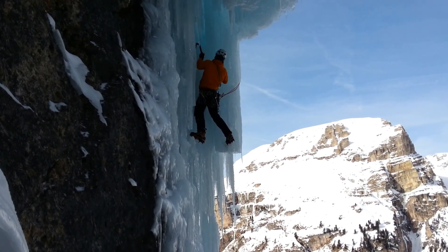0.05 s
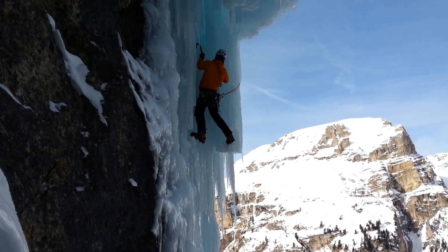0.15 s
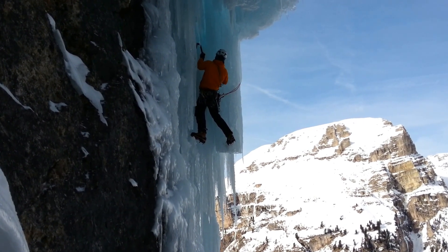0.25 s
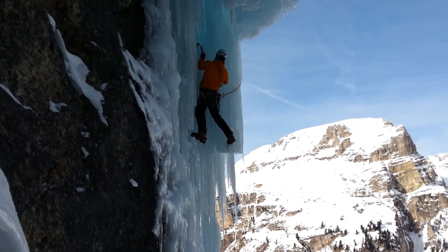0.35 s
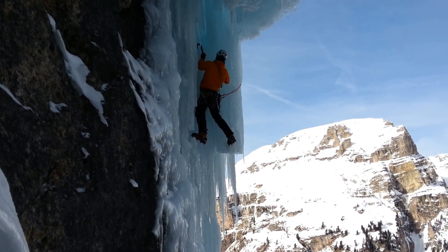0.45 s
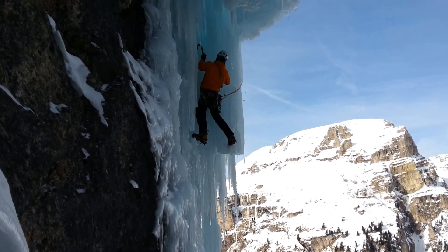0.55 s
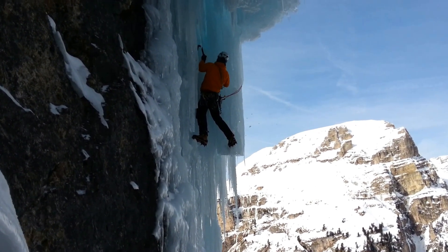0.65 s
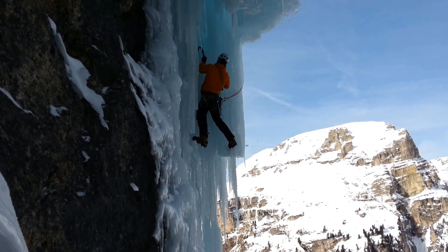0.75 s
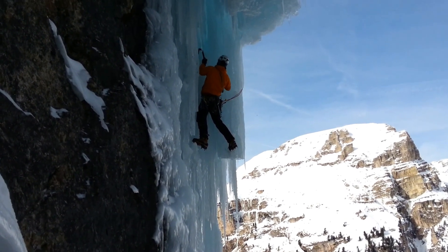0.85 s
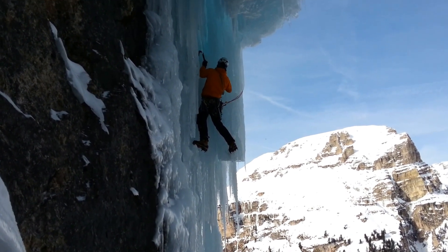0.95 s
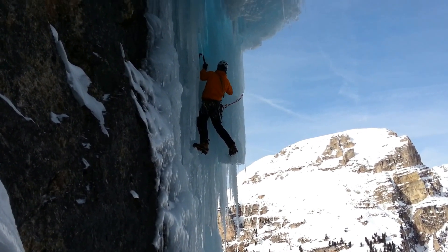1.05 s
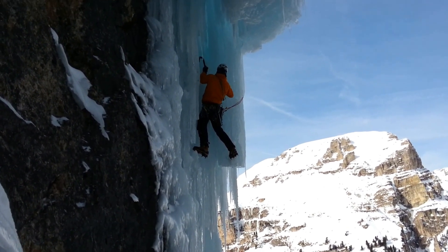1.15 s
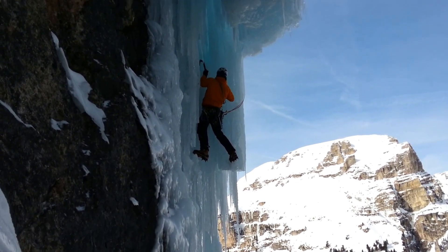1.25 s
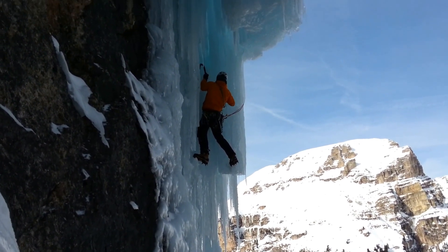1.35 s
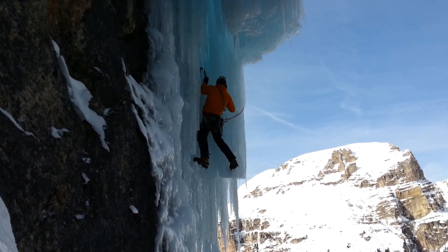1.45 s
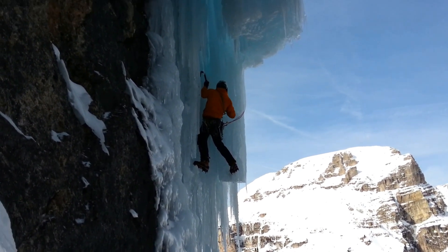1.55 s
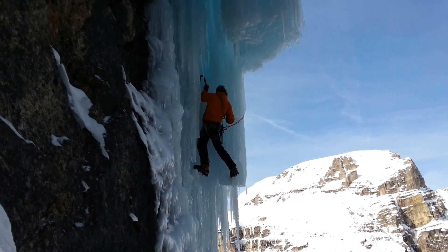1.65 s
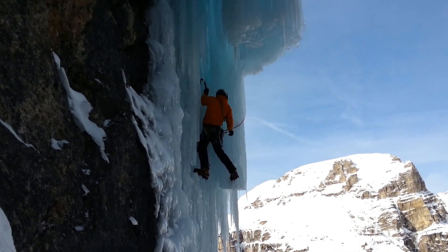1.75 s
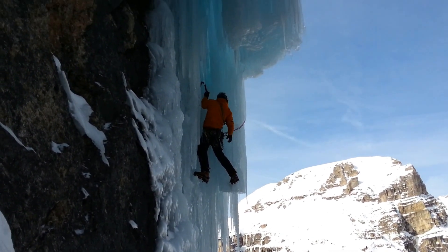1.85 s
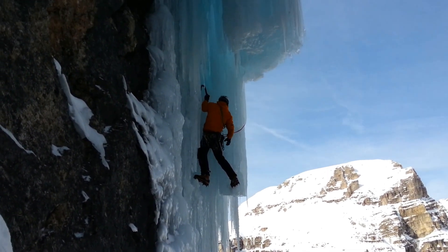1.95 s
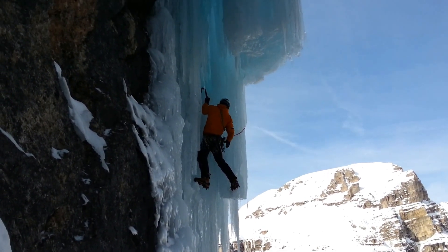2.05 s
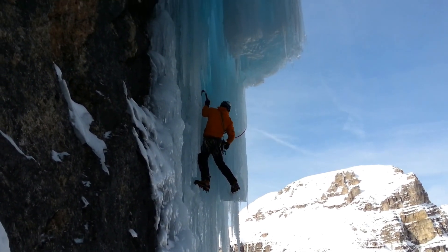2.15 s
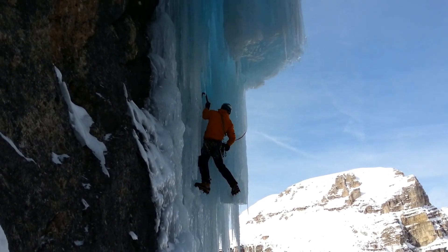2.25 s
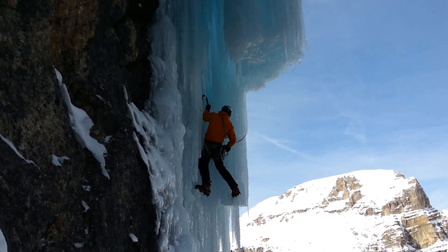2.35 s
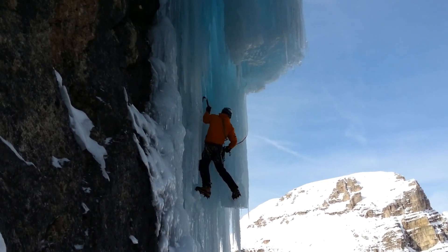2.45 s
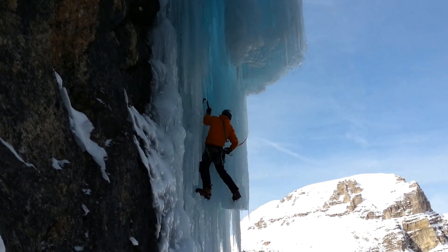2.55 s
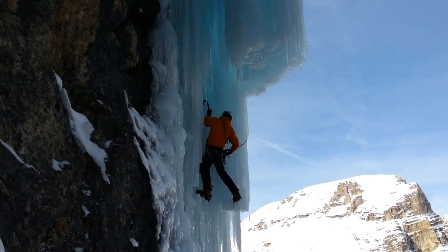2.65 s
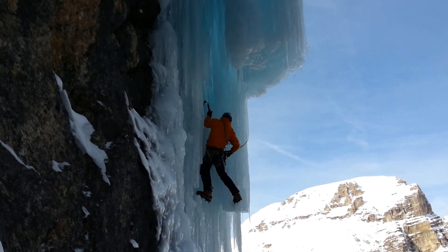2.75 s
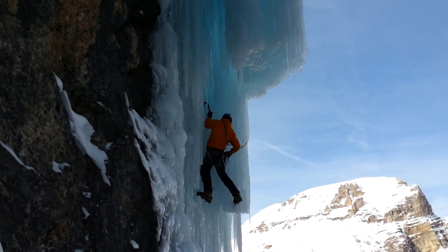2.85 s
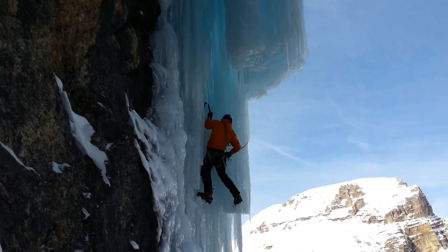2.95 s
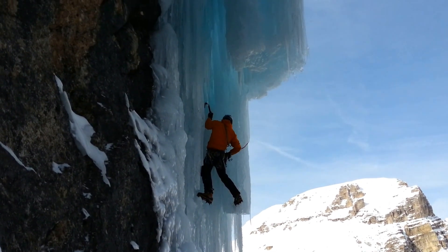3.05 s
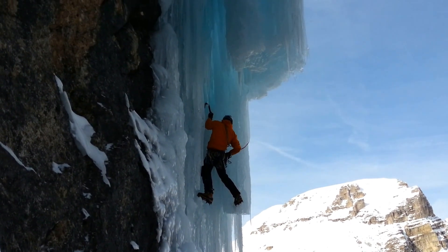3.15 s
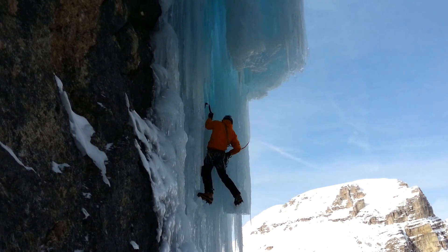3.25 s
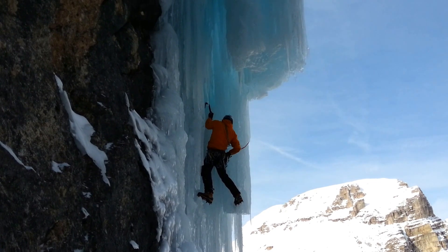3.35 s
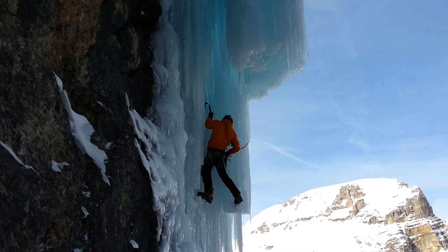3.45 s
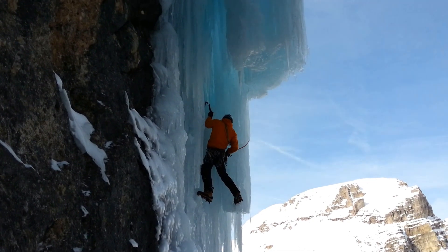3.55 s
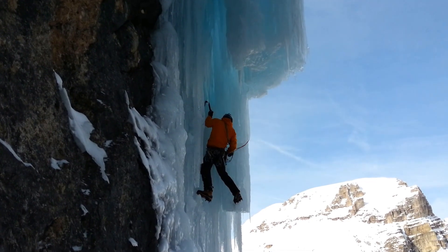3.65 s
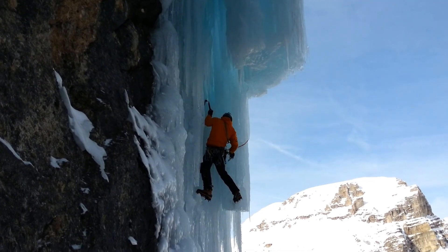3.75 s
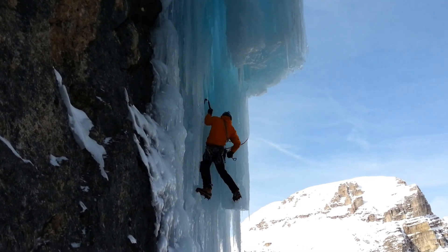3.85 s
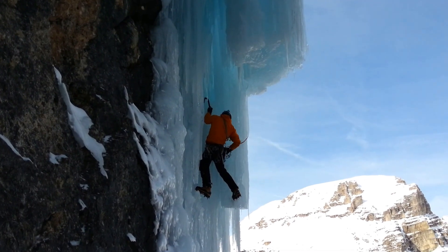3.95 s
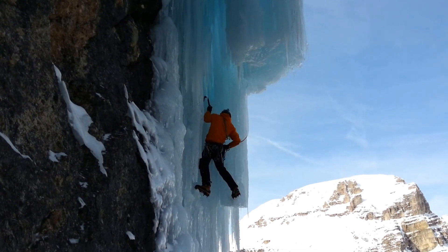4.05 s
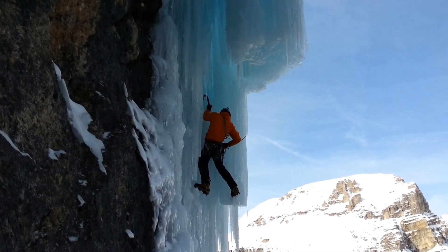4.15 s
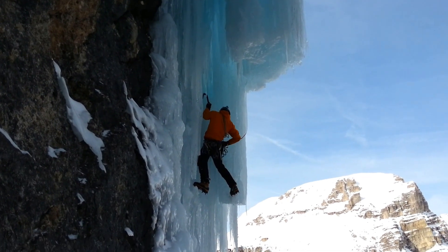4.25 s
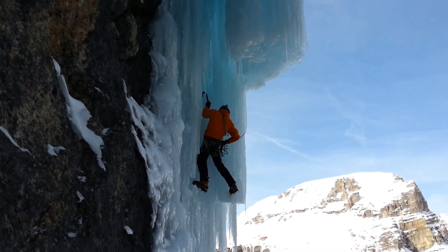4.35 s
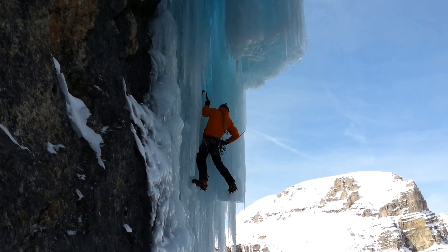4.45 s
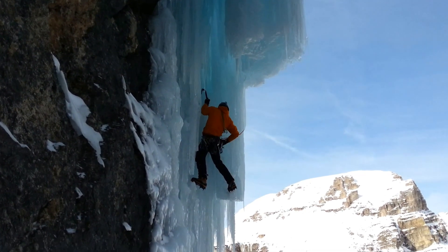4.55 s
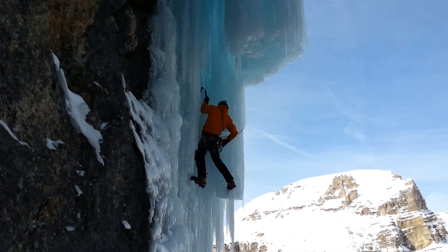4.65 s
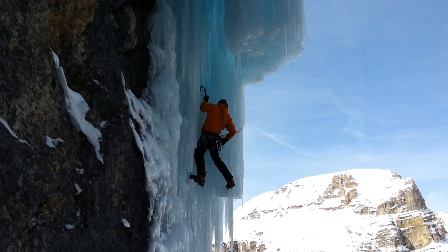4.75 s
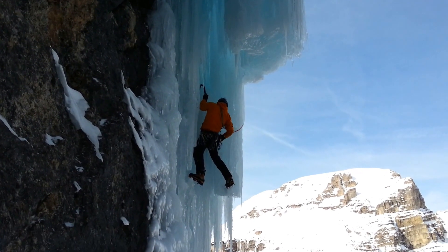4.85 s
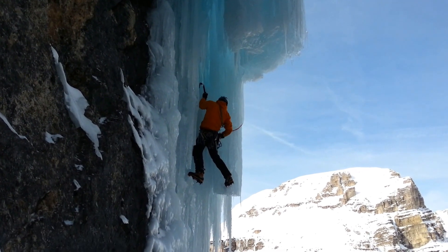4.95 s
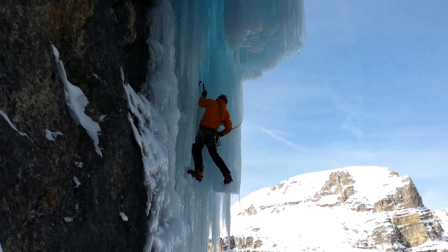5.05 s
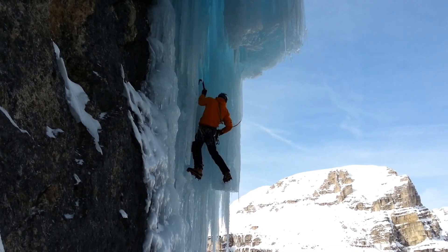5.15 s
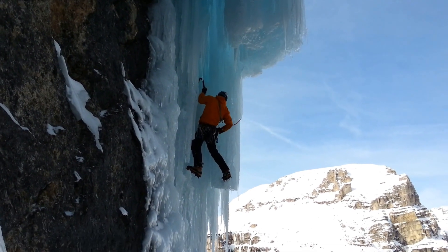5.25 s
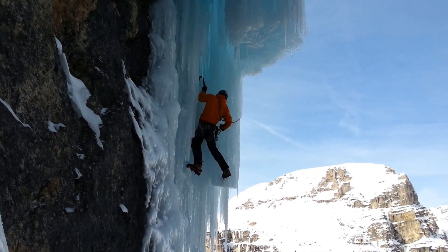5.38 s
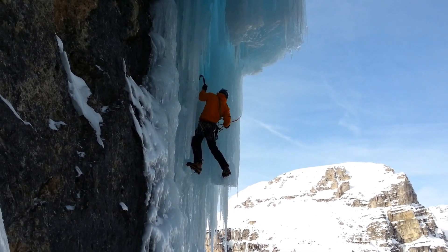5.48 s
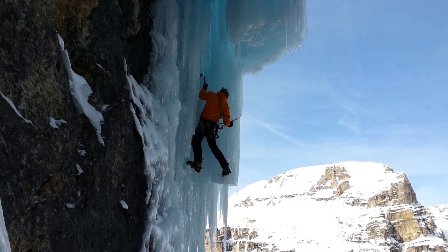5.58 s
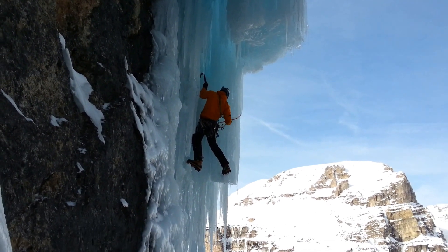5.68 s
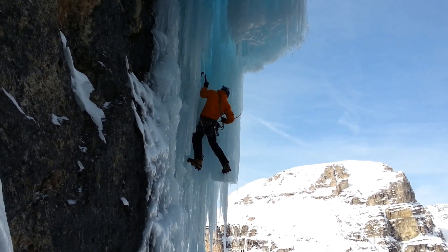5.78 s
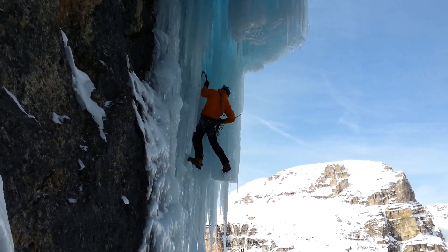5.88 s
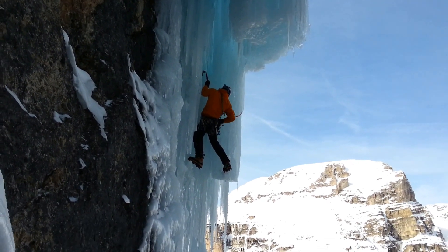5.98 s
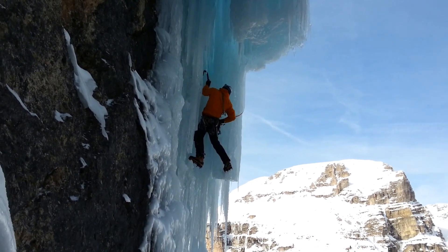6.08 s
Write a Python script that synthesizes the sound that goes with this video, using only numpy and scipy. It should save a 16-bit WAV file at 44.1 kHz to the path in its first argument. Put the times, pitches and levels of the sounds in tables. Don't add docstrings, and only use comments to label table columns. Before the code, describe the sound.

Outdoors beside a rock wall, light melt water patters. Almost at once a single loud pick blow cracks brittle ice, with a short hollow ring and quick rocky echo. Afterwards only water: pitched drips and fine ticks growing denser, a few soft lumps of ice landing, a tiny bubbling, one faint gear clink late on. Two spaced microphones, water leaning left, thin hiss beneath.

```python
import sys
import numpy as np
from scipy import signal
from scipy.fft import rfft, irfft, next_fast_len
from scipy.io import wavfile
from scipy.ndimage import uniform_filter1d, map_coordinates

SR = 44100
rng = np.random.default_rng(int(sys.argv[2]) if len(sys.argv) > 2 else 0)


def pcm_store(signal):
    levels = np.round(np.clip(np.atleast_2d(signal), -1, 1) * 32767)
    wavfile.write(sys.argv[1], SR, levels.astype(np.int16).T)


def rack_gain(trim_db):
    fader = np.asarray(trim_db, float)
    return 10 ** (fader / 20)


N = 269712

# start in seconds, level in dB, T60 in seconds.
BLOW = [
    (0.172, -12, 0.045),
    (0.1752, 4.5, 0.0048),
    (0.1761, 2, 0.013),
    (0.182, -16, 0.12),
    (0.198, -22, 0.03),
    (0.2105, -22, 0.03),
    (0.229, -28, 0.03),
]


def unit(x):
    return x / np.sqrt(np.mean(x ** 2) + 1e-20)


def along(points, hz):
    f, v = np.transpose(points)
    return np.interp(np.log(hz + 1), np.log(f + 1), v)


def wobble(rate):
    knots = rng.standard_normal(int(N * rate / SR) + 4)
    return map_coordinates(knots, [np.arange(N) * rate / SR])


def filtered(x, response):
    m = next_fast_len(x.shape[-1] + 8192)
    return irfft(rfft(x, m) * response(np.fft.rfftfreq(m, 1 / SR)), m)[..., :x.shape[-1]]


def aside(pair):
    late_s = np.array([[0], [17.5 / SR]])
    return filtered(pair, lambda hz: np.exp(-2j * np.pi * hz * late_s))


def grains(s, hz, cycles, gain, size):
    t = np.arange(size) / SR
    ring = np.sin(2 * np.pi * hz[:, None] * t) * rack_gain(-60 * t * (hz / cycles)[:, None])
    at = (s * SR).astype(int)[:, None] + np.arange(size)
    return np.bincount(at.ravel(), (gain[:, None] * ring).ravel(), N + size)[:N]


def pick():
    # frequency in Hz, level in dB, T60 in seconds.
    modes = [(143, -1, 0.19), (326, -38, 0.36), (526, -9, 0.17), (723, -6.5, 0.32), (782, -10, 0.52),
             (866, -5, 0.18), (891, -14, 0.52), (955, 1, 0.14), (1306, -11, 0.25), (1416, -12, 0.18),
             (1550, -20, 0.19), (2560, 13, 0.03), (6600, -15, 0.25)]
    # time in seconds, level in dB, Hz, width in seconds.
    seat = (0.17685, 0, 1120, .0005)
    bite = (0.1757, -8, 2700, .0008)
    # delay in seconds, level in dB.
    echoes = [
        (.031, -14),
        (.092, -23),
        (.123, -23),
    ]
    ledge_hz, ledge_width_hz, bass_cut_hz, splinter_db = 800, 390, 400, 3.5
    t = np.arange(SR) / SR

    cracks = 0
    for s, db, t60 in BLOW:
        age = np.maximum(t - s, 0)
        cracks = cracks + rack_gain(db - 60 * age / t60) * (1 - np.exp(-age / 0.00076))
    cracks = cracks * rack_gain(splinter_db * wobble(300)[:SR] * (t > .181))
    noise = rng.standard_normal((3, SR))
    split = filtered((noise[0] + 0.52 * noise[1:]) * cracks, icy)

    age = np.maximum(t - BLOW[1][0], 0)
    ring = 0
    for hz, db, t60 in modes:
        phase = rng.normal(0, 0.26, (2, 1))
        ring = ring + rack_gain(db - 60 * age / t60) * np.sin(2 * np.pi * hz * age + phase)
    hit = rack_gain(2.5) * split + rack_gain(-22.5) * ring * (1 - np.exp(-age / 0.002))

    s, db, hz, width = seat
    gap = np.exp(-((t - s) / width) ** 2)
    hit = hit * (1 - gap) - rack_gain(db) * np.cos(2 * np.pi * hz * (t - s)) * gap
    s, db, hz, width = bite
    hit = hit + rack_gain(db) * np.cos(2 * np.pi * hz * (t - s)) * np.exp(-((t - s) / width) ** 2)

    def reflected(f):
        ledge = 1j * f * ledge_width_hz / (ledge_hz ** 2 - f * f + 1j * f * ledge_width_hz)
        back = 1 + ledge * sum(rack_gain(db) * np.exp(-2j * np.pi * f * s) for s, db in echoes)
        return back * f ** 2 / (f ** 2 + bass_cut_hz ** 2)

    return np.pad(filtered(hit, reflected) * rack_gain([[1.2], [-1.2]]), ((0, 0), (0, N - SR)))


def icy(hz):
    # frequency in Hz, level in dB per Hz.
    slope = [(60, -72), (130, -23), (350, -11), (550, -13.5), (900, -5.5), (1400, -4.5), (2600, -5.5),
             (4000, -8.5), (5400, -11), (7000, -17), (9000, -23), (15000, -34)]
    # centre in Hz, width in Hz, level in dB.
    hollows = [(517, 83, -4), (730, 100, -0.5), (900, 130, 5), (1360, 170, 2), (1650, 250, -0.5),
               (2030, 250, -1), (2560, 250, -2), (2970, 590, 0), (3900, 460, 1), (4450, 280, -3),
               (5250, 430, 2.5), (6680, 240, 1.5), (7280, 440, 3), (10500, 8200, -1)]
    bands = sum(rack_gain(db) * 1j * hz * w / (c * c - hz * hz + 1j * hz * w) for c, w, db in hollows)
    return rack_gain(along(slope, hz) + 2) * bands


def drops():
    out, t = np.zeros((2, N + 3000)), np.arange(3000) / SR
    splash_band = signal.butter(2, [4500, 15000], "band", fs=SR)
    spatter_band = signal.butter(1, [2200, 7000], "band", fs=SR)
    for s, db, hz, pan_db, splash_db in all_drips():
        noise = rng.standard_normal((3, len(t)))
        alike = noise[0] + .5 * noise[1:]

        body_band = signal.butter(2, [hz * .65, min(hz * 1.5, 20000)], "band", fs=SR)
        rough = unit(signal.lfilter(*body_band, alike))
        age = t * hz / 1.15
        body = rack_gain(db - 1.5) * (np.sin(2 * np.pi * hz * t) + .25 * rough) * age * np.exp(1 - age)

        tick = t / .00025
        burst = signal.lfilter(*splash_band, alike * tick * np.exp(1 - tick))
        splash = rack_gain(splash_db) * 1.05 * burst / np.abs(burst).max(1, keepdims=True)

        dying = rack_gain(-60 * t / 0.18) * (1 - np.exp(-t / 0.0005))
        spatter = rack_gain(db - 21.5) * signal.lfilter(*spatter_band, noise[1:])
        spatter = spatter + rack_gain(splash_db - 23) * signal.lfilter(*splash_band, noise[1:])

        pan = rack_gain([[pan_db / 2], [-pan_db / 2]])
        out[:, round((s - .0003) * SR):][:, :len(t)] += pan * (body + splash) + spatter * dying
    return out[:, :N]


def all_drips():
    # start in seconds, ring level in dB, pitch in Hz, splash level in dB.
    fringe = [(.0652, -29, 4560, -31), (2.2446, -16.5, 4220, -36), (2.2721, -25, 5090, -36),
              (2.4141, -14.5, 4300, -38), (2.5094, -16.5, 6400, -27), (2.7081, -23.5, 3900, -53),
              (2.7503, -21.5, 4350, -23.5), (2.9, -26, 4370, -26), (2.9273, -18.5, 6460, -36),
              (2.9844, -17, 4500, -35), (3.0284, -19.5, 4560, -28.5), (3.2601, -21.5, 3900, -26),
              (3.4983, -23, 3780, -26.5), (3.493, -31, 4000, -30), (3.503, -26, 3600, -40),
              (4.7567, -11.5, 4930, -16.5), (4.7565, -35, 1880, -40), (3.7349, -31, 4800, -26),
              (3.7954, -21, 3900, -26), (3.972, -14.5, 4800, -26), (4.0408, -19, 4810, -28),
              (4.0739, -25, 2900, -37), (4.1846, -26, 5760, -27.5), (4.4326, -20, 3700, -41),
              (4.5851, -31, 4740, -27), (4.7563, -10, 3600, -16), (5.047, -15, 3800, -43),
              (5.0654, -20, 5600, -24), (5.2447, -19.5, 6800, -27), (5.3865, -23, 5080, -35),
              (5.4092, -23.5, 3680, -27), (5.4613, -27, 5200, -25.5), (5.7666, -29, 4430, -28.5),
              (6.0351, -9, 5200, -8), (6.0388, -16, 5500, -24)]
    foot = [(.4015, -42, 2700, -50), (.6374, -30, 4880, -26), (.6867, -23, 2900, -24.5),
            (.7089, -22.5, 3070, -40), (.7834, -26, 1760, -51), (.8537, -37, 2200, -46),
            (1.0644, -30, 3100, -23.5), (1.0825, -30, 4360, -20), (1.1788, -28, 3500, -30),
            (1.1883, -23, 3050, -42), (1.2804, -28.5, 2770, -27), (2.0864, -30.5, 3000, -40),
            (1.6485, -31.5, 2350, -29), (1.908, -22.5, 3500, -29), (1.9895, -29, 3650, -31.5),
            (2.0033, -32, 1820, -34), (2.2086, -26, 3080, -28.5), (2.6004, -26.5, 3000, -27),
            (2.9566, -21, 2870, -27), (3.2805, -33, 2030, -35), (3.549, -23.5, 2170, -38),
            (3.5492, -25.5, 3700, -42), (3.8466, -20, 2560, -32), (4.0566, -30, 2310, -43),
            (4.2791, -20, 3800, -23.5), (4.7622, -15.5, 3800, -30), (4.7819, -24, 4600, -34),
            (4.8514, -41, 3900, -45), (5.9718, -30, 4780, -30), (6.0199, -34, 5200, -27),
            (6.0238, -31, 9900, -36), (1.4997, -27, 1400, -50), (3.2606, -30.5, 1890, -50),
            (3.5262, -31, 7260, -34), (6.0565, -28, 4100, -35)]
    glaze = [(.9495, -45, 5460, -27), (.9903, -28.5, 7300, -33), (1.4995, -23.5, 2920, -42),
             (1.6337, -27, 4540, -33), (2.8512, -26, 4170, -40), (2.8729, -25, 3810, -29.5),
             (3.1838, -42, 6400, -31), (3.3182, -29, 6560, -29), (3.3271, -23, 4300, -28.5),
             (3.6213, -25, 6500, -30), (3.821, -27, 4630, -27), (3.9306, -37, 2861, -33),
             (4.0805, -26, 7200, -24), (4.228, -30, 3050, -42), (4.2635, -19, 3800, -41),
             (4.315, -26, 4700, -30), (4.3621, -31, 4220, -43), (4.3803, -24, 7200, -30),
             (4.409, -33, 5500, -28), (4.5212, -33, 2900, -30), (4.9068, -32, 4570, -27),
             (5.2729, -22, 4350, -30), (5.371, -25.5, 4060, -33), (5.6136, -41, 5700, -25),
             (5.6252, -26.5, 4300, -40), (5.6602, -27, 4100, -28), (5.8062, -22.5, 4460, -31),
             (5.8886, -26, 3560, -48)]
    # start in seconds, peak level in dB, pitch in Hz.
    small = [(0.0004, -30.5, 1900), (0.1438, -30, 2800), (0.4714, -35, 3230), (1.2144, -34, 2050),
             (1.259, -33, 1596), (1.3625, -32, 1780), (1.401, -33, 1390), (1.5198, -30, 4310),
             (1.5354, -34, 2100), (1.5475, -36, 1240), (1.787, -34, 1880), (1.8472, -32.5, 3190),
             (1.913, -35, 1980), (1.9966, -23, 3700), (2.079, -30, 2200), (2.4498, -41, 2260),
             (2.9114, -29, 4010), (3.073, -28, 4840), (3.5268, -28, 4960), (3.6913, -27, 1350),
             (4.2374, -26, 3870), (4.2517, -26, 4820), (4.3374, -32, 4010), (4.3534, -34, 1810),
             (4.3615, -34, 2170), (4.6896, -24, 3800), (4.8798, -30, 4900), (5.127, -25.5, 4675),
             (5.2348, -29, 4630), (5.741, -28, 4640), (5.7518, -25.5, 3710), (6.0804, -25, 3770),
             (6.0924, -34, 4750), (6.1034, -28, 3560), (6.1074, -33, 3370)]
    bright = [(0.256, -30, 6550), (1.7333, -28.5, 6820), (2.0135, -39, 12000), (2.3376, -36, 10300),
              (2.778, -29, 7570), (2.81, -38, 9050), (3.0096, -29, 8520), (3.297, -33.5, 7350),
              (3.9968, -36, 10500), (4.122, -32, 9200), (4.2386, -32, 7500), (4.2944, -35, 9720),
              (4.5152, -30, 12300), (4.702, -37, 10300), (4.881, -37, 7270), (4.9184, -35, 7456),
              (4.9956, -36, 7040), (5.648, -34, 8840), (6.0384, -15.5, 9800)]
    faint = [(0.7499, -34, 3360), (0.7828, -35, 5560), (0.7843, -32, 2760), (0.8365, -31, 2800),
             (0.9152, -33, 2840), (1.1882, -28, 4390), (1.4027, -30, 1510), (1.4028, -33, 3140),
             (1.4806, -31, 4350), (1.4987, -31, 4010), (1.8649, -33, 4650), (1.9382, -34, 10770),
             (2.0338, -32, 3270), (2.0825, -32, 2930), (2.0859, -32, 4180), (2.3657, -34, 4780),
             (2.424, -33, 3230), (2.4245, -34, 2150), (2.4506, -32, 2630), (2.482, -32, 4610),
             (2.5419, -31, 5000), (2.674, -35, 4180), (2.9563, -30, 5430), (2.9634, -33, 1980),
             (2.9883, -30, 3790), (3.1374, -33, 4820), (3.4421, -34, 9860), (3.4423, -34, 3140),
             (3.6821, -33, 4610), (3.6869, -35, 3920), (3.7114, -30, 3060), (3.9903, -33, 3100),
             (4.2371, -30, 3920), (4.2781, -26, 3920), (4.3151, -29, 2840), (4.3372, -33, 2110),
             (4.619, -32, 4870), (4.6287, -32, 2240), (4.8063, -32, 3230), (4.9547, -33, 4650),
             (4.9855, -34, 2760), (4.9958, -32, 3100), (5.1275, -35, 3960), (5.1469, -35, 4390),
             (5.2351, -33, 2710), (5.3429, -34, 4740), (5.4649, -34, 2540), (5.5872, -36, 3320),
             (5.6262, -36, 2330), (5.6926, -34, 4180), (5.7157, -33, 8570), (5.7409, -34, 3960),
             (5.7877, -34, 4520), (5.8187, -32, 4390), (5.8449, -35, 11540), (5.9754, -33, 3060),
             (6.056, -32, 2070), (6.1035, -29, 3450)]
    minor = [(s + .0004, db + 0.5, hz, db - 6) for s, db, hz in small]
    minor += [(s + 0.00045, db + 1, hz, db + 1.5) for s, db, hz in bright]
    minor += [(s + .0006, db + 0.1, hz, db - 14) for s, db, hz in faint]
    rows = []
    for place, pan_db in [(fringe, -6), (foot, 0.4), (glaze, -7.5), (minor, -2)]:
        for s, db, hz, splash_db in place:
            rows.append((s, db, hz, pan_db + 1.5 * rng.standard_normal(), splash_db))
    return rows


def thuds():
    # start in seconds, peak level in dB, pitch in Hz.
    landings = [(1.3605, -21, 950), (2.0035, -27, 600), (2.603, -29, 324), (0.54, -32, 810),
                (4.599, -55, 727), (6.03, -36, 460), (4.183, -36, 370)]
    s, db, hz = np.transpose(landings)
    lumps = grains(s, hz, 6., rack_gain(db), size=3000)
    return filtered(lumps, lambda f: f ** 4 / (f ** 4 + 170 ** 4))


def bubbles():
    # start in seconds, level in dB, pitch in Hz.
    escapes = [(3.177, -33, 950), (3.184, -34, 1310), (3.193, -30, 1030), (3.205, -38, 1850),
               (3.217, -40, 1495)]
    life_s, rise = 0.0088, .12
    out, u = np.zeros(N), np.arange(round(life_s * SR)) / (life_s * SR)
    for s, db, hz in escapes:
        glide = np.sin(2 * np.pi * hz * life_s * u * (1 + rise * u / 2))
        out[round(s * SR):][:len(u)] += rack_gain(db) * np.sin(np.pi * u) * glide
    return out


def clink():
    # frequency in Hz, level in dB, T60 in seconds.
    steel = [(2990, -36.5, 0.15), (3620, -33.5, 0.13), (4700, -32, 0.091), (6930, -34, 0.16),
             (10500, -36, 0.22)]
    t = np.maximum(np.arange(N) / SR - 4.6285, 0)
    ring = 0
    for c, db, t60 in steel:
        noise = rng.standard_normal((2, N))
        band = unit(filtered(noise, lambda hz: 1 / (1 + ((hz - c) / (.045 * c)) ** 2)))
        ring = ring + rack_gain(db - 60 * t / t60) * band
    return ring * rack_gain(-2.5 + 2.5 * wobble(180)) * (1 - np.exp(-t / 0.0002))


def rock(x, stretch):
    # frequency in Hz, T60 in seconds.
    decay = [(200, 0.34), (800, 0.38), (3000, 0.29), (7000, 0.25), (14000, 0.22)]
    step, out = SR // 4, np.zeros((2, N + SR))
    for a in range(0, len(x), step):
        hz, t, z = signal.stft(rng.standard_normal((2, SR // 3)), SR, nperseg=256)
        fall = rack_gain(-60 * t / (stretch * along(decay, hz))[:, None])
        tail = signal.istft(z * fall, SR, nperseg=256)[1]
        wet = signal.fftconvolve(x[None, a:a + step], tail / np.linalg.norm(tail[0]), axes=1)
        out[:, a + 150:][:, :wet.shape[1]] += wet
    return out[:, :N]


def water():
    # time in seconds, flow level in dB, spray over gurgle in dB.
    course = [(0.0, -43, 10.5), (0.08, -45, 1), (1.05, -46, 0), (1.38, -44, -4.5), (1.58, -47.5, 0.5),
              (2.03, -45, 1), (2.91, -44.5, 3.5), (3.05, -44.5, 4), (3.32, -44.5, 1), (4.09, -45, 1.5),
              (4.24, -44.5, 3.5), (4.38, -44, 5), (4.6, -47.5, 6), (4.9, -44.5, 4), (5.309, -46.5, 2.5),
              (6.12, -46.5, 0.5)]
    # frequency in Hz, level in dB per Hz.
    gurgle = [(88, -33), (150, -10), (270, -3), (529, 0), (1250, 0), (2500, -7), (3250, -50), (5500, -120)]
    patter = [(700, -16), (1400, -6.5), (2500, -5), (4000, 0), (5300, -8.5), (5900, -15), (8000, -16.5)]
    spray = [(3000, -25), (5800, -1), (7000, 0), (10000, -1), (13000, -2.5), (14600, -4)]
    s, *cols = np.transpose(course)
    flow_db, spray_db = [np.interp(np.arange(N) / SR, s, c - c.mean()) for c in cols]
    shower_db = showers()
    low_db = -50.5 + 0.46 * flow_db - spray_db / 2 + 0.6 * shower_db
    mid_db = -47.5 + flow_db + shower_db
    high_db = -51 + 0.65 * flow_db + spray_db / 2 + 1.06 * shower_db
    top_db = 2.6
    swell = top_db * np.tanh((.2 * wobble(14) + 1.15 * wobble(60)) / top_db)

    ticks = far_drops(count=1400, hz=6500, spread=.45, cycles=6, scatter_db=3)
    plinks = far_drops(count=2500, hz=3530, spread=0.42, cycles=14, scatter_db=3)
    glugs = far_drops(count=900, hz=686, spread=0.83, cycles=4.3, scatter_db=2.0)
    low = rack_gain(low_db + 2.0 + .5 * swell) * rush(gurgle, 0.088 * glugs, patchy_db=2.0)
    mid = rack_gain(mid_db + 2.5 + 1.45 * swell) * rush(patter, 0.22 * plinks + 0.4 * ticks, patchy_db=2.2)
    high = rack_gain(high_db + 3 + 1.7 * swell) * rush(spray, .5 * ticks, patchy_db=.9)
    flow = low + mid * rack_gain([[-.6], [.6]]) + high * rack_gain([[-1.2], [1.2]])
    return aside(filtered(flow, lambda f: f ** 4 / (f ** 4 + 110 ** 4)))


def showers():
    # time in seconds, swell in dB, fading time in seconds.
    swells = [(1.26, 4, 0.32), (1.47, 4.5, 0.1), (2.85, 2, 0.051), (4.228, 4, 0.34), (4.455, -7, 0.072),
              (4.509, 6, 0.019), (4.628, 6, 0.028), (5.045, 0, 0.017), (5.142, -3, 0.068), (6.076, 3, 0.052),
              (3.485, 1, 0.036), (2.49, -6, 0.0096), (1.9, -6, 0.055), (2.208, 5.5, 0.06),
              (5.985, -2.5, 0.036), (4.742, -3, 0.014), (0.685, -5, -0.03), (2.206, -5, -0.04),
              (3.97, -3, -0.03), (1.178, 4, 0.08), (3.68, 3, 0.07), (2.03, 3, 0.02), (2.075, 4, 0.02),
              (0.782, 3, 0.06), (2.9, 2, 0.12), (5.064, 6, 0.03), (4.77, 3, 0.04), (6.04, 3, 0.03),
              (0.439, -3.0, -0.07), (0.604, 7.0, 0.04), (0.878, -3.5, 0.025), (1.065, 6.0, -0.04),
              (1.17, 3.0, 0.025), (1.439, -4.0, -0.07), (1.591, -4.0, 0.025), (1.649, 2.0, 0.2),
              (2.115, -4.0, -0.04), (2.135, 4.0, 0.015), (2.168, -4.0, 0.015), (2.19, 5.5, 0.015),
              (2.27, -5.0, -0.025), (2.287, 2.5, 0.04), (2.38, -3.5, 0.025), (2.462, 3.0, 0.07),
              (2.614, 4.5, -0.015), (2.686, -2.5, 0.07), (2.883, 6.0, -0.025), (2.943, -3.5, -0.025),
              (3.223, -2.5, -0.2), (3.352, 2.5, -0.07), (3.38, -2.5, 0.07), (3.579, -4.5, 0.025),
              (3.849, 4.0, -0.04), (3.896, -4.0, 0.04), (4.188, 5.0, -0.04), (4.298, 4.5, -0.025),
              (4.383, -4.0, -0.025), (4.58, -4.0, -0.015), (4.605, 5.5, 0.025), (4.709, -5.5, 0.025),
              (4.854, 4.0, 0.04), (5.036, -3.5, -0.025), (5.211, -3.5, -0.07), (5.273, 5.0, -0.025),
              (5.405, 5.0, -0.07), (5.587, -2.0, -0.07), (5.637, -4.5, 0.015), (5.66, 4.0, 0.025),
              (5.772, 4.5, 0.04), (5.874, -7.0, 0.04), (5.922, -4.0, 0.025), (5.981, 3.0, 0.12)]
    t = np.arange(0, N / SR, .001)
    s, db, fade = np.transpose(swells)[:, :, None]
    age = (t - s) / fade
    swell_db = (db * (age > 0) * np.exp(-np.abs(age))).sum(0)
    return np.interp(np.arange(N) / SR, t, swell_db)


def rush(spectrum, grit, patchy_db):
    # frequency in Hz, left-right likeness from 0 to 1.
    likeness = [(60, 0.057), (300, 0.79), (700, 0.22), (2000, 0.26), (5000, 0.019), (12000, 0.014)]
    z = signal.stft(rng.standard_normal((2, N)), nperseg=256)[2]
    field = uniform_filter1d(rng.standard_normal(z.shape[1:]), size=6, axis=0)
    field = uniform_filter1d(field, size=8, axis=1)
    pair = unit(signal.istft(z * rack_gain(patchy_db * unit(field)), nperseg=256)[1][:, :N])
    pair = pair + np.array([grit, 0 * grit])

    def mid_side(hz):
        turn = np.arccos(np.clip(along(likeness, hz), 0, 1)) / 2
        return rack_gain(along(spectrum, hz)) * [np.cos(turn), np.sin(turn)]

    mid, side = filtered(pair, mid_side)
    return unit(np.array([mid + side, mid - side]))


def far_drops(count, hz, spread, cycles, scatter_db):
    u, g = rng.random((count, 2)), rng.standard_normal(count)
    size = rack_gain(-scatter_db * np.log(u[:, 1] + .1))
    pitch = np.clip(hz * np.exp(spread * g), 200, 15000)
    return unit(grains(u[:, 0] * N / SR, pitch, cycles * np.ones(count), size, size=200))


def breeze():
    # frequency in Hz, level in dB per Hz.
    rumble = [(15, -21), (40, -3.5), (90, 2), (160, 2), (260, -41)]
    # time in seconds, level in dB, half width in seconds.
    gusts = [(.05, -73, 0.096), (.65, -74.5, 0.37), (1.65, -73, 0.16), (2.15, -51, 0.04),
             (2.35, -72, 0.058), (3.1, -76, 1), (3.7, -68, 0.14), (4.05, -79, 0.05), (4.65, -70, 0.18),
             (5.1, -72, .1), (5.8, -75, 0.33)]
    t = np.arange(N) / SR
    buffet = unit(filtered(rng.standard_normal((2, N)), lambda hz: rack_gain(along(rumble, hz))))
    strength = rack_gain(-79) + sum(rack_gain(db) * np.exp(-((t - s) / half) ** 2) for s, db, half in gusts)
    return strength * rack_gain(1.5 * wobble(10)) * buffet


def facets(hz):
    delays = (.0016, .0042, .0046, .0051)
    return sum(rack_gain(-15) * np.exp(-2j * np.pi * hz * np.array([[s], [s - .0004]])) for s in delays)


def scene():
    far, blow = water() + clink() + breeze(), pick()
    near = drops() + thuds() + bubbles()
    impulse = 1. * (np.arange(SR // 4) == round(BLOW[1][0] * SR))
    shock = filtered(impulse, icy)
    tails = rack_gain(-11) * rock(near.mean(0), stretch=0.68)
    tails = tails + rack_gain([[23.5], [20.5]]) * rock(shock, stretch=1.12)
    return aside(near + filtered(near, facets)) + blow + tails + far


def roll_off(x):
    return signal.sosfilt(signal.butter(12, 15700, fs=SR, output="sos"), x)


def record(dry):
    shut = filtered(dry, lambda hz: np.where(hz < 14650, 1, rack_gain(-56)))
    return roll_off(shut)


dry = scene()
out = record(dry)
pcm_store(out)
```